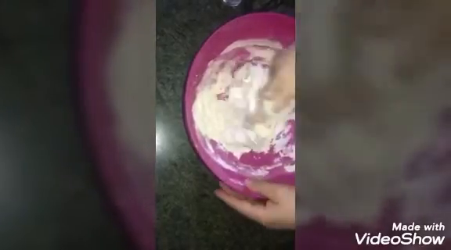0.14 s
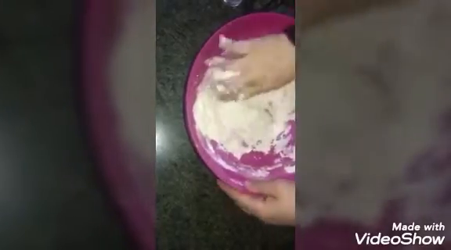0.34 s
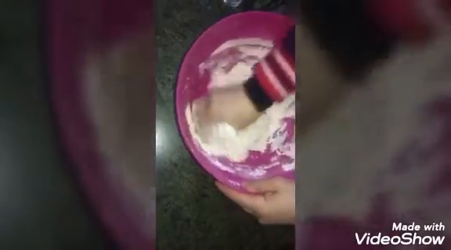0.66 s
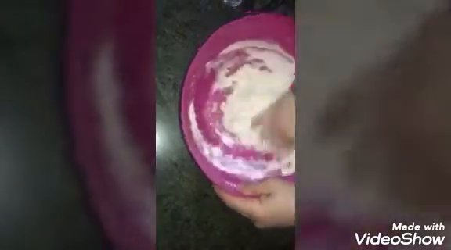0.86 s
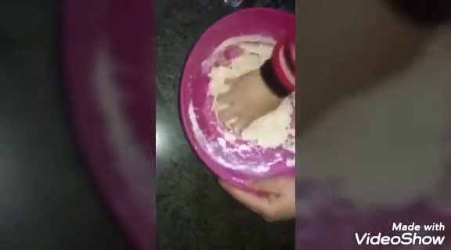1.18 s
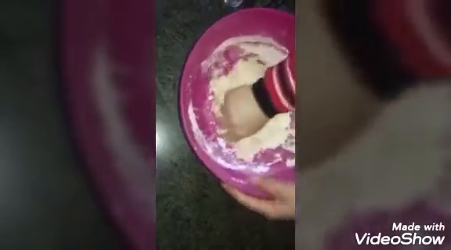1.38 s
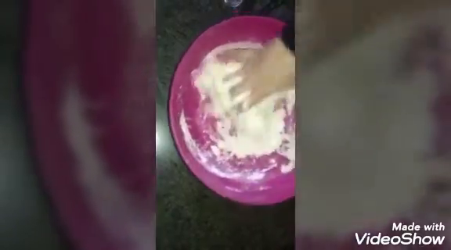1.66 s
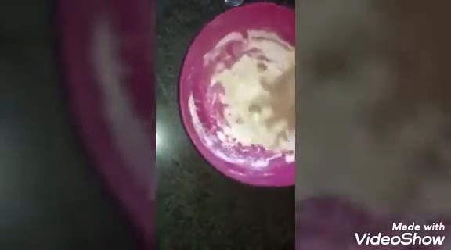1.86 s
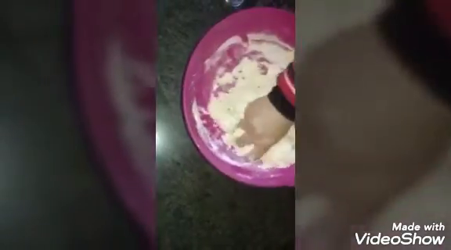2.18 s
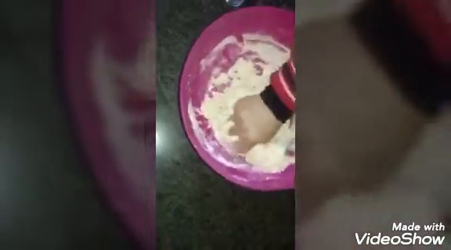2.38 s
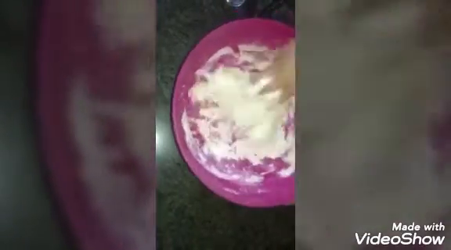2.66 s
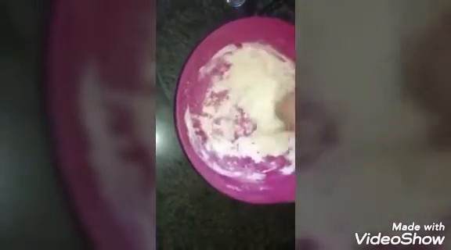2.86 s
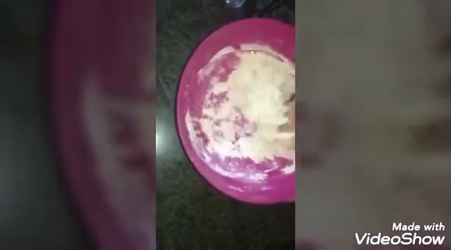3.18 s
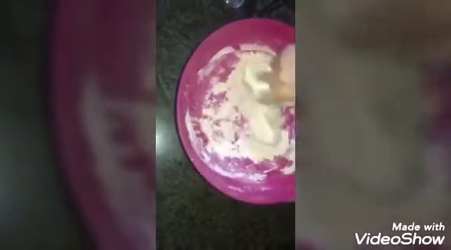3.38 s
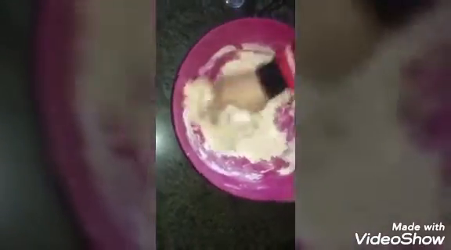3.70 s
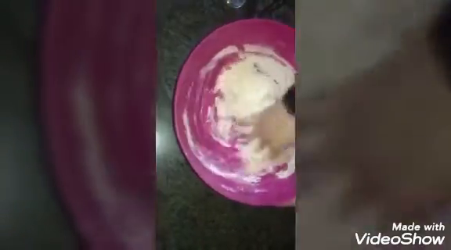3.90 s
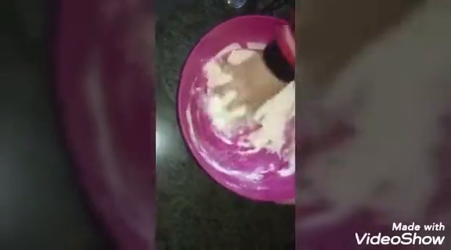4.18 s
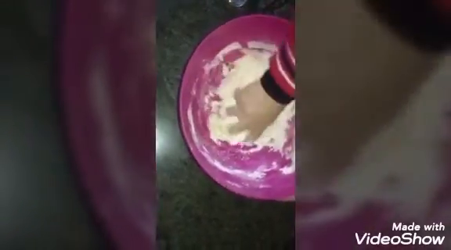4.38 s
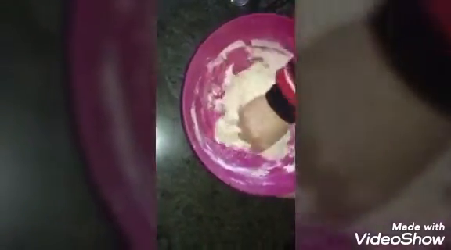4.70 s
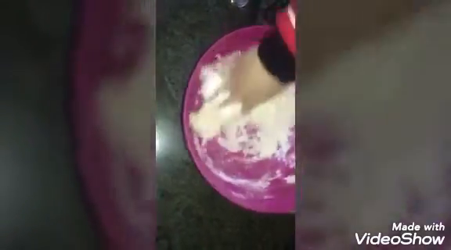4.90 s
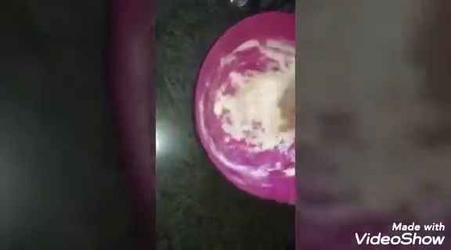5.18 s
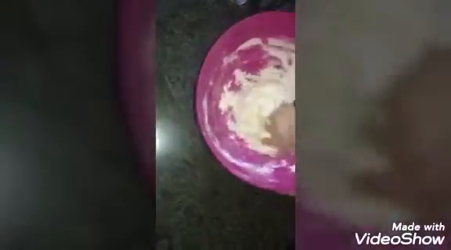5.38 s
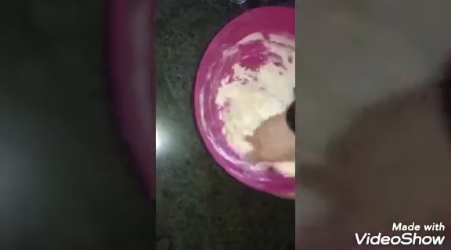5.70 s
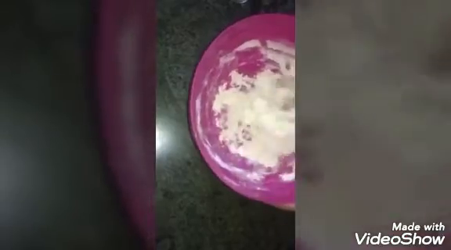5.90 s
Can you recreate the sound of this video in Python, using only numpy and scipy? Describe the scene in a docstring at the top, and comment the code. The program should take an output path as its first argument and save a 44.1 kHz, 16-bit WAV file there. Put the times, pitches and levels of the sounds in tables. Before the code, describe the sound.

Sticky dough drags and scrapes over plastic in short uneven strokes, heard close with slight room reflections. The bowl gives hollow, quickly damped thuds, strongest around the middle, with tiny air pops and faint squelches between pushes. The rubbing thins out after the biggest blow, returns in softer rubs, then grows quick and dense before easing away. Quiet air and low hum lie beneath.

```python
"""In a small hard kitchen a hand kneads sticky dough in a plastic bowl on a stone counter. Stick-slip friction
drags the dough over the wall as a dense crackle, shaped by resonances and pushes. Blows excite dying modes of
the bowl and the room, air pockets ring as they pop, wet gaps glide in pitch as they squelch, and shoves shake
the bowl as low narrow-band noise. Reflections, faint air and a hum surround it."""
import sys
import numpy as np
from scipy import signal
from scipy.fft import rfft, irfft
from scipy.io import wavfile
from scipy.ndimage import uniform_filter1d

SR = 44100
rng = np.random.default_rng(int(sys.argv[2]) if len(sys.argv) > 2 else 0)


def int16_out(signal):
    """Quantize to a 16-bit WAV file."""
    q = np.round(np.clip(np.atleast_2d(signal).T, -1, 1) * 32767)
    wavfile.write(sys.argv[1], SR, q.astype(np.int16))


N = 266805

# modes of the loaded bowl floor, a short thud with the main mode last: [f/Hz, relative level/dB, t60/s]
THUD = [(200, 1, 0.0031), (399, 1, 0.031), (530.5, 16, 0.023)]


def kneading(drag_db=0.0, rub_db=-0.45, scrape_db=1.5, fizz_db=0.0, grip_db=-0.18, wall_db=-7):
    """Stick-slip friction: slips sound through the wall, pressure drives the low ring, flour adds fizz."""
    # colour of dough rubbing on plastic: [f/Hz, spectral density/dB per Hz]
    rub_colour = [(160, -6.5), (280, -8), (390, -2.5), (530, 2.5), (700, -7), (1750, -5), (4300, -9),
                  (5000, -11.5), (7500, -20), (9600, -21.5), (11500, -34)]
    pressure, rub, fizz = effort()
    grip = gain_of(grip_db * flutter(rate_hz=160))  # the dough grips and lets go

    friction = patchy(coloured(slips(per_s=8000, size_db=0.5), rub_colour))
    crackle = through_wall(across_bowl(friction))
    flour = coloured(rng.standard_normal((2, N)), rub_colour)
    powder = through_wall(across_bowl(flour))
    wall = evened(signal.oaconvolve(crackle, ringing(long_ring())[None], axes=1)[:, :N])

    drag = evened(band(crackle, 175, 600) + gain_of(wall_db) * wall)
    out = gain_of(drag_db) * grip * pressure * drag
    out += gain_of(rub_db) * grip * rub * band(crackle, 857, 2040)
    scrape = np.sqrt(rub * fizz)  # half dough, half flour
    out += gain_of(scrape_db) * scrape * band(crackle, 2380, 4710)
    out += gain_of(fizz_db) * fizz * band(powder, 5540, 13500)
    return spread(*out)


def effort(swell_shape=1.03):
    """Power addition: overlapping pushes sum to the amplitudes of wall pressure, rubbing and fizz."""
    # pushes of the hand: [t/s when full, rubbing level/dB, rise/s, hold/s, fall/s,
    # pressure on the wall/dB over the rubbing, floury fizz/dB over the rubbing]
    pushes = [(0.01, -66.5, 0.076, 0.087, 0.094, 10, -5), (0.338, -60.0, 0.035, 0.019, 0.073, 1, -10),
              (0.591, -52, 0.014, 0.015, 0.01, 0, -12), (0.724, -46.5, 0.051, 0.052, 0.082, -3.5, -11),
              (0.86, -51, 0.04, 0.094, 0.097, -1, -2), (1.1, -48.5, 0.083, 0.023, 0.091, 0, -34),
              (1.161, -44.5, 0.028, 0.021, 0.065, -3, -12), (1.321, -48, 0.031, 0.024, 0.026, -2, -16.5),
              (1.405, -60, 0.021, 0.009, 0.15, -13, 0), (1.542, -53.5, 0.035, 0.031, 0.25, 6, -12.5),
              (1.636, -50.5, 0.0071, 0.08, 0.013, -1, -6.5), (1.746, -53, 0.043, 0.06, 0.049, 6, -13),
              (1.881, -42, 0.013, 0.0083, 0.059, 0.5, -10.5), (1.97, -43, 0.021, 0.03, 0.026, 5.5, -7.5),
              (2.067, -51, 0.09, 0.013, 0.14, -1, -9.5), (2.502, -47.5, 0.071, 0.027, 0.1, -2, -7),
              (2.64, -54, 0.023, 0.11, 0.063, 8.5, -7.5), (2.923, -47, 0.027, 0.016, 0.045, 1.5, -6.5),
              (3.062, -59.5, 0.049, 0.031, 0.22, 1, -11), (3.75, -48.5, 0.01, 0.032, 0.034, -1, -12),
              (3.867, -49.5, 0.094, 0.17, 0.12, -4, -4.5), (4.053, -49, 0.02, 0.011, 0.048, 4, -15),
              (4.19, -54.5, 0.064, 0.041, 0.035, 4, -9.5), (4.303, -54, 0.021, 0.12, 0.049, 3, -8.5),
              (4.362, -49.5, 0.0096, 0.005, 0.0082, 0, -16), (4.534, -64.5, 0.083, 0.023, 0.14, -9, -0.5),
              (4.804, -54.5, 0.028, 0.026, 0.027, -2.5, -8), (4.865, -44.5, 0.013, 0.018, 0.054, -3, -9.0),
              (5.033, -43, 0.039, 0.036, 0.059, 0.5, -8), (5.207, -49.5, 0.018, 0.015, 0.043, 0, -12.5),
              (5.277, -43.5, 0.0068, 0.024, 0.045, -1, -1.5),
              (5.314, -44.5, 0.027, 0.066, 0.03, -1.5, -10.5), (5.444, -55, 0.087, 0.067, 0.29, -0.5, -3.5),
              (5.664, -50, 0.037, 0.072, 0.075, 2, -7.5), (5.958, -53.5, 0.11, 0.03, 0.24, 1, -11)]
    # the hand resting in the dough between pushes: pressure, rubbing, fizz [level/dB]
    resting = (-69.5, -76, -87)
    t = np.arange(N) / SR
    power = gain_of(resting)[:, None] ** 2 * np.ones(N)
    for s, db, rise_s, hold_s, fall_s, pressure_db, fizz_db in pushes:
        before = np.maximum((s - t) / rise_s, 0)
        after = np.maximum((t - s - hold_s) / fall_s, 0)
        full = gain_of(db + np.array([pressure_db, 0, fizz_db]))
        # shape 1 gives sharp shoulders, 2 round ones
        power += full[:, None] ** 2 * np.exp(-2 * (before + after) ** swell_shape)
    return np.sqrt(power)


def slips(per_s, size_db):
    """Stick-slip release: sticky dough lets go in random clicks of random strength."""
    size = gain_of(size_db * np.minimum(rng.exponential(1, (2, N)), 4))
    happens = rng.random((2, N)) < per_s / SR
    return size * rng.standard_normal((2, N)) * happens


def patchy(x, patch_db=2.0):
    """Time-varying filtering: the contact patch changes shape, so the colour of the rub drifts."""
    z = signal.stft(x, nperseg=512, noverlap=384)[2]
    field = rng.standard_normal(z.shape[1:])
    field = uniform_filter1d(field, size=7, axis=0)  # smooth over frequency
    field = uniform_filter1d(field, size=16, axis=1)  # smooth over time
    varied = z * gain_of(patch_db * evened(field))
    return signal.istft(varied, nperseg=512, noverlap=384)[1][:, :N]


def across_bowl(x, echo_db=-9, delay_s=0.001306, travel=0.208):
    """Comb filtering: the far wall returns the rub with a delay that sweeps as the hand travels."""
    n = np.arange(N)
    late = n - delay_s * SR * np.exp(travel * flutter(rate_hz=4.05))
    return x + gain_of(echo_db) * np.array([np.interp(late, n, channel) for channel in x])


def through_wall(x, lift_db=5.0, width_hz=65):
    """Resonant transmission: the wall favours its own narrow resonances."""
    # thin high resonances of the wall that colour the rubbing: [f/Hz]
    wall_hz = [862, 1676, 2505, 3383, 4118, 5595, 8534]
    near = sum(1 / (1 + (2 * (bins(x) - hz) / width_hz) ** 2) for hz in wall_hz)
    return irfft(rfft(x) * gain_of(lift_db * near), N)


def bowl():
    """Impulsive excitation: knocks, air pops, squelches and low shudders of the bowl."""
    # knocks: [t/s, strength/dB, sway of the low modes under a soft palm/dB, snap/dB over the strength]
    knocks = [(0.346, -40, 30, -18), (1.349, -43.5, -9, -7), (1.522, -35, -1, -18), (1.755, -33, -9, -37),
              (1.767, -31.5, 14, -23), (1.95, -27.5, 10, -21), (2.36, -47.5, 11.5, -21.5),
              (2.6185, -22, 0, -4.5), (2.6256, -12.5, 12.5, -10.5), (2.659, -29, 12.5, -6),
              (2.848, -45, 11, 0.5), (2.904, -39, 6, -22), (3.2277, -5, -6.5, -15.5),
              (3.2334, -19.5, 8.5, -26), (3.649, -45, 13, -35.5), (3.739, -31.5, 12, -17),
              (4.1291, -17.5, 1.5, -31), (4.631, -50, 0, -15.5), (4.894, -21.5, 6.5, -17),
              (5.2872, -20.5, 9, -13), (5.4439, -17.5, 7.5, -20)]
    # pockets of air popping out of the dough: [t/s, level/dB, f/Hz, t60/s]
    pops = [(1.24, -32.5, 747, 0.028), (1.523, -27, 810, 0.016), (1.607, -33, 1820, 0.013),
            (2.6196, -20.5, 175, 0.055), (2.6262, -27, 1035, 0.014), (4.1292, -31, 1200, 0.016),
            (5.013, -34, 2310, 0.014), (5.4437, -15, 882, 0.016)]
    # partials of the lopsided cavity of a pop: [multiple of its pitch, relative level/dB]
    cavity = [(.91, 0.5), (1.1, 0), (1.7, -11), (2.452, -17.5), (3.65, -16.5)]
    # wet dough squeezed through a gap or squeaking on the wall:
    # [t/s at the middle, level/dB, half-length/s, start f/Hz, end f/Hz]
    squelches = [(0.768, -48, 0.03, 480, 537), (1.154, -46, 0.076, 2500, 1350),
                 (1.174, -37, 0.032, 554, 506), (1.651, -47, 0.085, 1900, 2720),
                 (3.857, -45, 0.067, 1540, 770), (4.071, -49, 0.053, 3440, 2750),
                 (5.83, -55, 0.095, 1250, 1150)]
    # nudges and shoves that make the bowl shudder on the counter: [t/s, level/dB, decay/s, f/Hz]
    shoves = [(0.1, -55.5, 0.055, 152), (1.593, -39.5, 0.078, 102), (5.438, -58, 0.25, 54.5)]
    out = np.zeros(N)
    t = np.arange(SR // 2) / SR
    for s, *blow in knocks:
        add(out, s, knock(*blow))
    for s, db, hz, t60 in pops:
        opening = 1 - np.exp(-t * hz * 2)  # it opens within a cycle
        partials = [(hz * multiple, db + level, t60) for multiple, level in cavity]
        add(out, s, opening * ringing(partials))
    for s, db, half_s, *glide in squelches:
        add(out, s - half_s, squelch(db, half_s, *glide))
    for s, db, decay_s, hz in shoves:
        shudder = band(rng.standard_normal(len(t)), hz / 1.26, hz * 1.22)
        add(out, s, gain_of(db) * shudder * np.exp(-2 * (t / decay_s) ** 2))
    return out


def knock(db, sway_db, snap_db, contact_s=0.00033, swell_s=0.0014, grit_db=-18, grit_s=0.006, snap_lead_s=0.001):
    """Modal excitation: a brief push makes the floor thud and the long ring sound; the hard edge snaps first."""
    # stiff, quickly damped modes of the plastic: [f/Hz, relative level/dB, t60/s]
    snap_modes = [(1124, -21, 0.0068), (1700, -5, 0.021), (1930, 2.5, 0.003), (2490, -2.5, 0.0029),
                  (5430, -4.5, 0.0017), (7080, -20, 0.0011)]
    t = np.arange(SR // 2) / SR
    modes = [(hz, level + sway_db * (hz < 430), t60) for hz, level, t60 in THUD + long_ring()]
    bending = ringing(modes) * (1 - np.exp(-t / swell_s))  # the bending takes a moment to spread
    body = signal.fftconvolve(bending, np.exp(-t / contact_s))[:len(t)]
    chatter = gain_of(grit_db) * rng.standard_normal(len(t)) * np.exp(-t / grit_s)
    contact = (t == 0) + chatter  # one hit, then chatter
    out = gain_of(snap_db) * signal.fftconvolve(contact, ringing(snap_modes))[:len(t)]
    add(out, snap_lead_s, body / abs(body).max())
    thinned = signal.butter(2, 115, "high", fs=SR, output="sos")  # the lows of each knock are thinned
    return gain_of(db) * signal.sosfilt(thinned, out)


def long_ring(ring_s=0.33, ring_fall=0.49):
    """Modal damping: lower modes of the bowl and the room ring longer, by a power law."""
    # long ring of the bowl and the room: [f/Hz, relative level/dB]
    ring = [(166, -27), (200, -28), (363, -23), (393, -32), (503, -32), (520, -23), (543, -32), (574, -32),
            (865, -34)]
    main_hz = THUD[-1][0]  # ring_s is the t60 at this frequency
    return [(hz, db, ring_s * (main_hz / hz) ** ring_fall) for hz, db in ring]


def squelch(db, half_s, start_hz, end_hz, width_share=0.39, per_s=1800):
    """Gliding cavity resonance: sticky threads snap in a wet gap that closes or opens."""
    swell = np.hanning(round(2 * half_s * SR))
    hz = np.geomspace(start_hz, end_hz, len(swell))
    snaps = rng.choice([-1., 1.], SR) * (rng.random(SR) < per_s / SR)
    width_hz = width_share * hz.mean()
    once = resonate(snaps[:len(swell)], hz, width_hz)
    return gain_of(db) * swell * evened(resonate(once, hz, width_hz))


def resonate(x, hz, width_hz):
    """Heterodyning: a resonance of gain 1 follows the curve hz, by shifting it to 0 Hz and back."""
    turn = np.exp(2j * np.pi * np.cumsum(hz) / SR)
    r = np.exp(-np.pi * width_hz / SR)
    return 2 * (turn * signal.lfilter([1 - r], [1, -r], x / turn)).real


def kitchen(x, build_s=0.02):
    """Reverberation: sparse reflections of random sign build up, each band dying at its own speed."""
    # decay of the room: [f/Hz, t60/s]
    decay = [(150, 1), (500, 0.45), (9000, 0.31)]
    taps = rng.choice([-1., 1.], (2, SR)) * (rng.random((2, SR)) < 3000 / SR)
    hz, t, z = signal.stft(taps, SR, nperseg=256)
    dying = np.exp(-np.log(1000) * t / read(decay, hz)[:, None])
    building = 1 - np.exp(-(t / build_s) ** 2)
    tail = signal.istft(z * dying * building, SR, nperseg=256)[1]
    tail = tail / np.linalg.norm(tail[0])
    return spread(*signal.fftconvolve(x[None], tail, axes=1)[:, :N])


def room_tone(air_db=-64, hum_db=-69, hum_hz=48.8):
    """Amplitude modulation: an appliance hum wavers over faint broadband air."""
    # colour of the air: [f/Hz, spectral density/dB per Hz]
    quiet = [(20, -22.5), (42, 3), (190, 0), (550, -11), (1100, -16.5), (11000, -29.5)]
    tone = np.sqrt(2) * np.sin(2 * np.pi * hum_hz * np.arange(N) / SR)
    hum = tone * (1 + 0.24 * flutter(rate_hz=11))
    air = spread(*coloured(rng.standard_normal((2, N)), quiet))
    return gain_of(air_db) * air + gain_of(hum_db) * hum


def spread(mid, side):
    """Interchannel coherence: left and right share the bass but differ in the treble."""
    # left-right likeness: [f/Hz, coherence from 0 to 1]
    likeness = [(500, 0.97), (2600, 0.95), (4500, 0.85), (8000, 0.34)]
    same = np.clip(read(likeness, bins(mid)), 0, 1)
    apart = irfft(rfft(side) * np.sqrt((1 - same) / (1 + same)), N)
    return np.array([mid + apart, mid - apart])


def ringing(modes):
    """Modal superposition: a sum of exponentially dying sines."""
    t = np.arange(SR // 2) / SR
    out = np.zeros(len(t))
    for hz, db, t60 in modes:
        out += gain_of(db) * np.exp(-np.log(1000) * t / t60) * np.sin(2 * np.pi * hz * t)
    return out


def flutter(rate_hz):
    """Low-passed chance: a Gaussian spectrum makes slow random variation of rms 1."""
    x = rng.standard_normal(N)
    return evened(irfft(rfft(x) * np.exp(-(bins(x) / rate_hz) ** 2), N))


def coloured(x, points):
    """Spectral shaping: gives x the colour of a table, at rms 1."""
    return evened(irfft(rfft(x) * gain_of(read(points, bins(x))), x.shape[-1]))


def band(x, lo_hz, hi_hz):
    """Band-pass filtering: one band of x, at rms 1."""
    edges = [lo_hz, min(hi_hz, SR / 2 - 1)]
    return evened(signal.sosfilt(signal.butter(3, edges, "band", fs=SR, output="sos"), x))


def gain_of(db):
    """Logarithmic level: decibels to amplitude."""
    return 10 ** (np.asarray(db) / 20)


def evened(x):
    """Power normalisation: scales to rms 1."""
    return x / np.sqrt(np.mean(x ** 2) + 1e-20)


def read(points, hz):
    """Interpolation: reads a table on a log-frequency axis."""
    f, value = np.transpose(points)
    return np.interp(np.log(hz + 1), np.log(f + 1), value)


def bins(x):
    """Fourier analysis: frequencies of the spectrum of x."""
    return np.fft.rfftfreq(x.shape[-1], 1 / SR)


def add(mix, s, sound):
    """Linear superposition: mixes a sound in at time s."""
    part = mix[max(round(s * SR), 0):][:len(sound)]
    part += sound[:len(part)]


def scene(room_db=-13):
    """Direct and reflected sound: the hand and the bowl close by, the room around them."""
    # first reflections from the walls: [delay/s, level/dB]
    reflections = [(0.014, -17), (0.0269, -18.5), (.047, -29.5), (.0565, -21.5)]
    blows = bowl()
    echoes = np.zeros(N)
    for delay, db in reflections:
        add(echoes, delay, gain_of(db) * blows)
    # walls return the lows whole
    echoes = signal.sosfilt(signal.butter(2, 1800, fs=SR, output="sos"), echoes)
    # clutter scatters the treble
    scattered = signal.sosfilt(signal.butter(2, 560, "high", fs=SR, output="sos"), blows)
    return kneading() + blows + echoes + gain_of(room_db) * kitchen(scattered) + room_tone()


def record(dry, edge_hz=11850):
    """Band limitation: a steep low-pass removes the highest treble."""
    lowpass = signal.firwin(401, edge_hz, window=("kaiser", 8), fs=SR)
    return signal.oaconvolve(dry, lowpass[None], "same")


dry = scene()
out = record(dry)
int16_out(out)
```